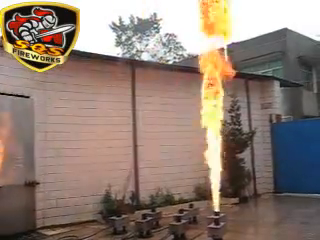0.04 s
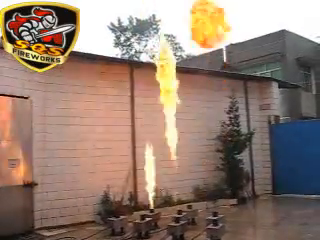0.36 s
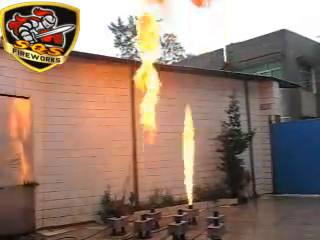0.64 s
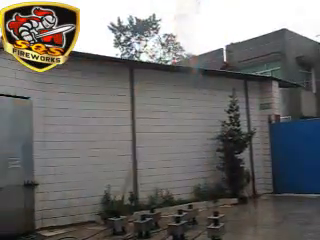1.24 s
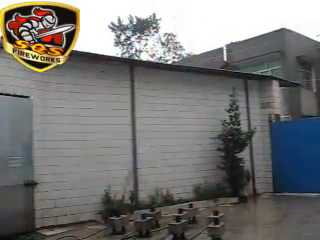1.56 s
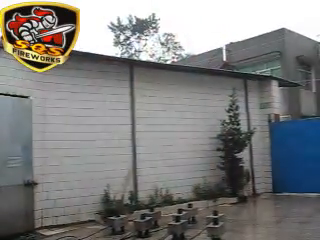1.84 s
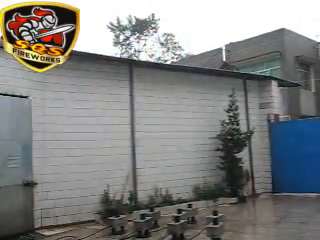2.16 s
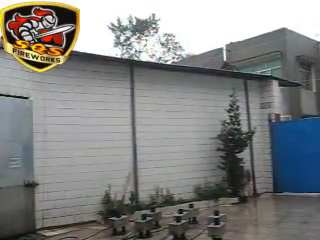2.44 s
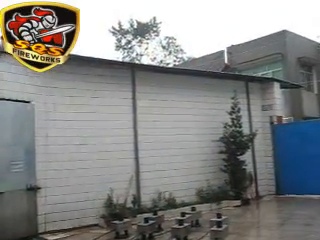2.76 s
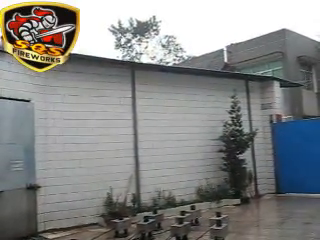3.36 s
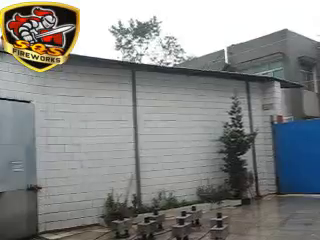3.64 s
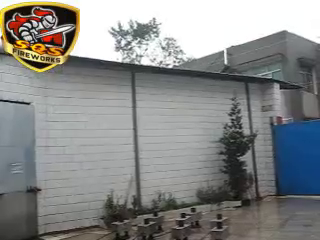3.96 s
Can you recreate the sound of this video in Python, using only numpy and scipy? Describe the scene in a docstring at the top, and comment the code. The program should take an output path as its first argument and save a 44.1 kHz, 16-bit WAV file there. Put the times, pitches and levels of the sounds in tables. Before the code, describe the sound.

A loud, fluttering roar of gas flames, with sizzling spray and deep booms, burns out quickly in an outdoor yard. Quiet rain follows on one microphone, slowly swelling, with a few close drops ticking on wet ground and metal.

```python
"""Flame machines fire a quick run of jets in a walled yard, heard on one microphone: nozzles hiss,
the burning gas roars and rolls up in booming fireballs. The valves shut and the last flame burns out.
Light rain patters near and far on the wet ground and the metal housings, over a low outdoor rumble.
It swells slowly as the recorder's gain control recovers from the roar."""
import sys
import numpy as np
from scipy import signal
from scipy.fft import rfft, irfft
from scipy.io import wavfile
from scipy.ndimage import uniform_filter1d

SR = 44100
rng = np.random.default_rng(int(sys.argv[2]) if len(sys.argv) > 2 else 0)


def transcribe(signal):
    """Save signal, clipped to [-1, 1], as a 16-bit WAV file at the path in sys.argv[1]."""
    frames = np.atleast_2d(signal).T
    limited = np.clip(frames, -1, 1)
    pcm = np.round(limited * 32767).astype(np.int16)
    wavfile.write(sys.argv[1], SR, pcm)


N = 176400

# spectrum of splashing rain and spitting fuel (frequency [Hz], level [dB])
SPLASH = [(300, -17.5), (1000, -5), (1800, 3), (3000, 4), (4700, 4), (5800, -2.5), (6500, -18), (7200, -43)]


def undb(db):
    """Decibels to gain."""
    return 10 ** (np.asarray(db) / 20)


def unit(x):
    """Scale to rms 1."""
    return x / np.sqrt(np.mean(x ** 2))


def curve(t, rows):
    """Gain along (time [s], level [dB]) points."""
    return undb(np.interp(t, *np.array(rows).T))


def colour(x, points):
    """Minimum-phase filter through (frequency [Hz], level [dB]) points."""
    hz, db = np.array(points).T
    f = np.arange(N + 1) * SR / (2 * N)
    gain = undb(np.interp(np.log(f + 1), np.log(hz), db))
    cepstrum = irfft(np.log(gain))
    cepstrum[1:N] *= 2
    cepstrum[N + 1:] = 0
    return irfft(rfft(x, 2 * N) * np.exp(rfft(cepstrum)))[:N]


def walk(hz):
    """Smooth random drift of rms 1."""
    hold = max(int(SR / hz), 1)
    steps = np.repeat(rng.standard_normal(N)[:N // hold + 1], hold)
    return unit(uniform_filter1d(uniform_filter1d(steps, hold), hold)[:N])


def pops(per_s, spread_db):
    """Random impulses, many small and a few large."""
    size = undb(spread_db * np.minimum(rng.exponential(size=N), 4))
    return (rng.random(N) < per_s / SR) * size * rng.choice([-1, 1], N)


def bursts(t, rows, decay_s):
    """Bursts of spray that start sharply and die away."""
    envelope = sum(undb(db) * (t >= at) * np.exp(-np.maximum(t - at, 0) / decay_s) for at, db in rows)
    return rng.standard_normal(N) * envelope


def walls(t, x):
    """The yard's walls throw a few early echoes back to the microphone."""
    # wall reflections (delay [s], level [dB])
    echoes = [(.0097, -18), (.0187, -17), (0.0234, -16), (.047, -13.5)]
    return x + sum(undb(db) * np.interp(t - delay, t, x, left=0) for delay, db in echoes)


def yard(t):
    """A low outdoor rumble comes and goes in the background."""
    # rumble spectrum (frequency [Hz], level [dB])
    spectrum = [(15, -17), (35, -5.5), (60, 1), (85, 2), (130, -4), (175, 1), (215, -2), (270, -1.5),
                (380, -9), (800, -53)]
    # its rise and fall (time [s], level [dB])
    swell = [(0, 11), (1.3, -3.5), (1.6, 1.5), (2.05, 1), (2.3, 4), (2.5, 0), (2.8, -2), (3.1, 3.5),
             (3.35, -3), (3.7, -0.5), (4, 3.5)]
    rumble = unit(colour(rng.standard_normal(N), spectrum))
    return rumble * undb(-35.5 + .7 * walk(hz=9.4)) * curve(t, swell)


def rain(t):
    """Countless far drops merge into a hiss; nearer ones patter."""
    # spectrum of far rain (frequency [Hz], level [dB])
    spectrum = [(150, -11.5), (360, -2), (440, -3), (550, 1), (780, 0.5), (920, -2.5), (1250, -1.5),
                (1600, -3.5), (2100, -1.6), (3200, -3.5), (4700, -8.5), (5600, -15), (6300, -26.5),
                (7000, -46)]
    # strength of the shower (time [s], level [dB])
    shower = [(0, 8.5), (1.5, -0.5), (1.72, 0), (1.85, 1.5), (2.4, -.5), (2.7, .5), (3.3, -1), (3.55, 1),
              (4, 0)]
    far_drops = colour(pops(per_s=14000, spread_db=1.6), spectrum)
    hiss = unit(walls(t, far_drops)) * undb(-30 + .48 * walk(hz=12))
    patter = unit(colour(pops(per_s=330, spread_db=3.7), SPLASH)) * undb(-41.5)
    return (hiss + patter) * curve(t, shower)


def drops(t):
    """Drops near the microphone tick and ring for an instant; one breaks into a spatter."""
    # drop impacts (time [s], level [dB], ring [Hz])
    impacts = [(2.0302, 3, 1790), (2.056, -7, 2110), (2.194, -8, 1550), (2.712, -8.5, 1900),
               (3.0547, -8, 1920), (3.524, -7, 4320), (3.6972, -4.5, 4530), (3.7725, -4, 4340),
               (3.923, -8.5, 2430)]
    # the breaking drop (time [s], level [dB])
    spatter = [(1.783, -19), (1.792, -29)]
    ring_s, ring_db = .00088, -16
    out = bursts(t, spatter, decay_s=.015)
    for at, db, hz in impacts:
        age = np.maximum(t - at, 0)
        out[int(at * SR)] += undb(db)
        out += undb(db + ring_db) * np.exp(-age / ring_s) * np.sin(2 * np.pi * hz * age)
    return colour(out, SPLASH)


def nozzles(t):
    """Fuel sprays out with a sizzling hiss and a few spits; the pressure sags, then is cut."""
    # spray spectrum (frequency [Hz], level [dB])
    spectrum = [(500, -22), (1400, 1), (2150, 3), (2600, 0), (3600, -0.5), (4700, -2), (5500, -8.5),
                (6300, -20), (7000, -41.5)]
    # spits of fuel (time [s], level [dB])
    spits = [(.063, -15), (.076, -10), (.285, -13), (.555, -17.5)]
    shut_s, sag_db_per_s, fall_db_per_s = .86, 3, 88
    hiss_db = -14 - sag_db_per_s * t - fall_db_per_s * np.maximum(t - shut_s, 0)
    hiss = unit(colour(pops(per_s=9000, spread_db=4), spectrum)) * undb(hiss_db + .5 * walk(hz=40))
    return hiss + colour(bursts(t, spits, decay_s=.013), SPLASH)


def fireballs(t):
    """Each ball of flame swells and fades with a low, unsteady boom."""
    # fireballs (peak time [s], pitch [Hz], level [dB], swell [s])
    booms = [(.06, 64, -2.5, 0.042), (.175, 238, -6, 0.023), (0.206, 66, -2, 0.032), (0.254, 88, -2.5, .04),
             (0.366, 110, -2, 0.031), (0.601, 132, 4.5, 0.066), (.68, 85, 2.5, 0.048),
             (0.784, 100, -4, 0.047), (.958, 105, -1.5, 0.011), (1.025, 130.5, -9, 0.019),
             (1.26, 106, -23, 0.02)]
    out = np.zeros(N)
    for at, hz, db, swell in booms:
        start = rng.random()
        pitch = hz * (1 + .035 * walk(hz=50.5))
        phase = 2 * np.pi * (start + np.cumsum(pitch) / SR)
        out += undb(db) * np.exp(-((t - at) / swell) ** 2) * np.sin(phase)
    return out


def flame(t):
    """Pockets of gas burn in dense pops: a deep rumble and a fluttering roar, until the valves shut."""
    # strength of the flame's rumble (time [s], level [dB])
    burn = [(0, -3.5), (.2, -5), (.3, -6.5), (.41, -3.5), (.5, -3), (.7, -7), (.8, -7.5), (.9, -10),
            (1.03, -17), (1.14, -23.5), (1.3, -30.5), (1.5, -46.5)]
    # spectra of the burning gas (frequency [Hz], level [dB])
    rumble_spectrum = [(15, -20), (30, 0), (43, -14.5), (62, -2.5), (90, -1), (130, 1), (165, -3.5),
                       (215, -0.5), (260, -8), (320, -8), (450, -22), (900, -67)]
    roar_spectrum = [(150, -10), (320, -1.5), (450, -2.5), (540, 2), (780, -1), (920, -6), (1080, -2.5),
                     (1500, -9), (2200, -12.5), (3500, -13), (7000, -54)]
    shut_s, fall_db_per_s, flutter_db = .85, 71, 1.46
    flutter = undb(flutter_db * walk(hz=46.8))
    rumble = unit(colour(pops(per_s=1600, spread_db=1.3), rumble_spectrum)) * curve(t, burn)
    roar = unit(colour(pops(per_s=5000, spread_db=2.37), roar_spectrum)) * flutter
    roar_db = -11.5 - fall_db_per_s * np.maximum(t - shut_s, 0)
    return rumble + walls(t, roar) * undb(roar_db)


def scene():
    """Flame jets over light rain, in mono at the microphone."""
    t = np.arange(N) / SR
    return (flame(t) + nozzles(t) + fireballs(t) + rain(t) + yard(t) + drops(t))[None]


def record(dry):
    """The recorder's gain control ducks under the roar and recovers slowly; the top is cut."""
    threshold_db, release_db_per_s, window_s, top_hz = -18, 4.5, .5, 6900
    loud_db = 10 * np.log10(uniform_filter1d(dry[0] ** 2, int(window_s * SR)) + 1e-12)
    over_db = np.maximum(loud_db - threshold_db, 0)
    release = release_db_per_s * np.arange(N) / SR
    duck_db = np.maximum.accumulate(over_db + release) - release
    lowpass = signal.ellip(8, .2, 70, top_hz, fs=SR, output="sos")
    return signal.sosfilt(lowpass, dry * undb(-duck_db))


dry = scene()
out = record(dry)
transcribe(out)
```